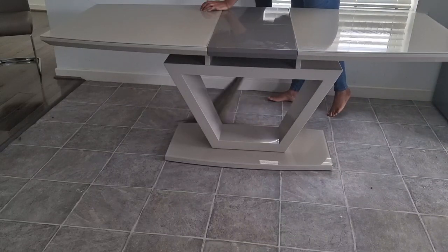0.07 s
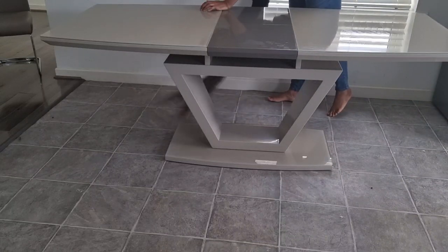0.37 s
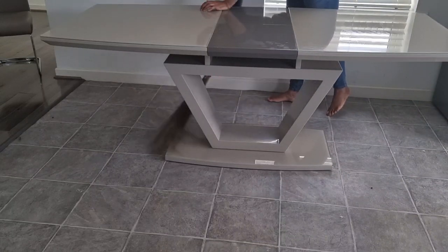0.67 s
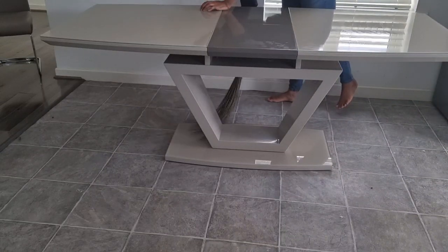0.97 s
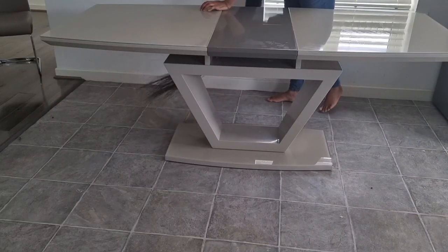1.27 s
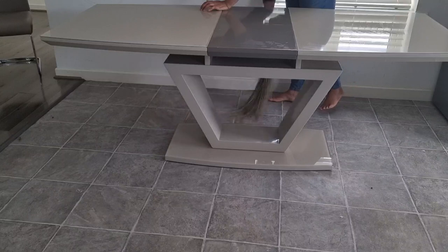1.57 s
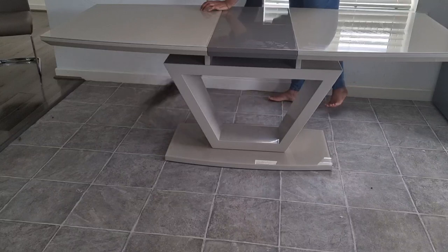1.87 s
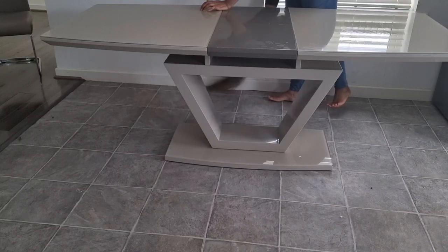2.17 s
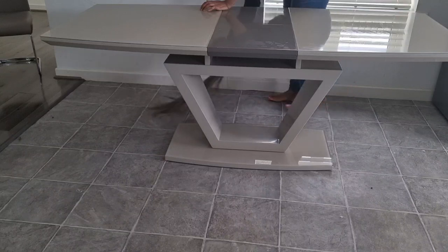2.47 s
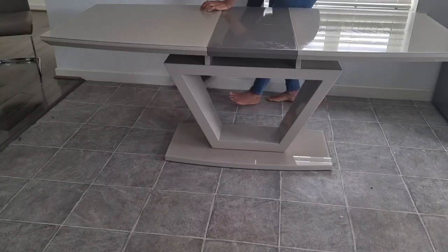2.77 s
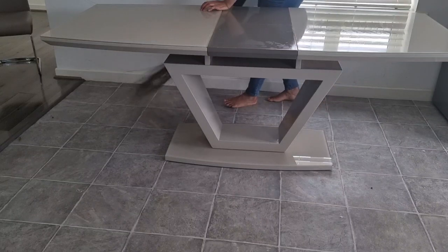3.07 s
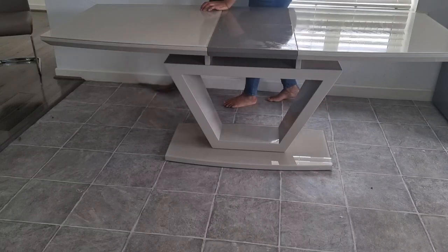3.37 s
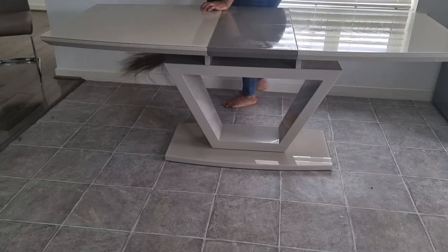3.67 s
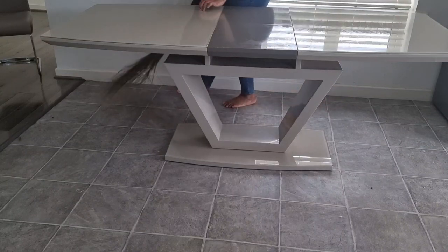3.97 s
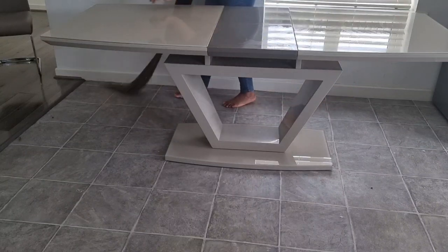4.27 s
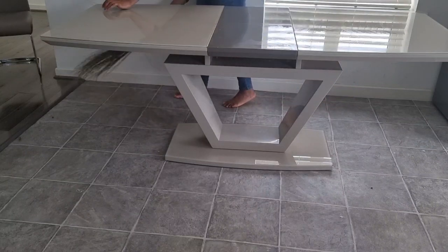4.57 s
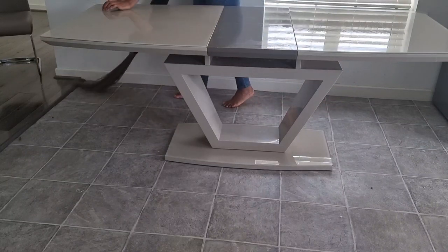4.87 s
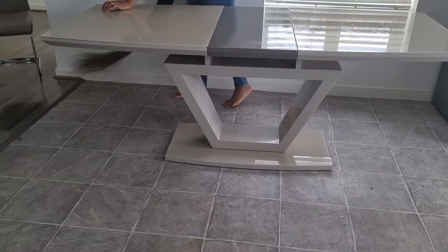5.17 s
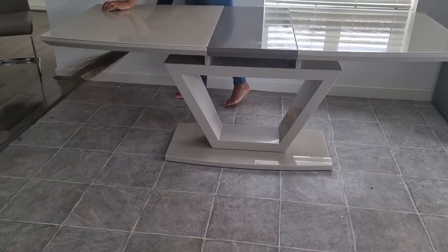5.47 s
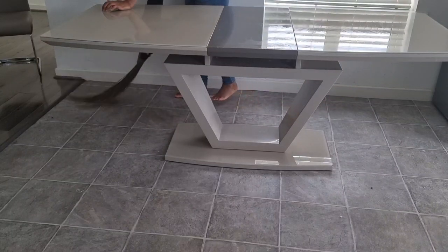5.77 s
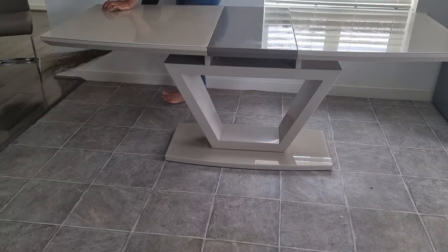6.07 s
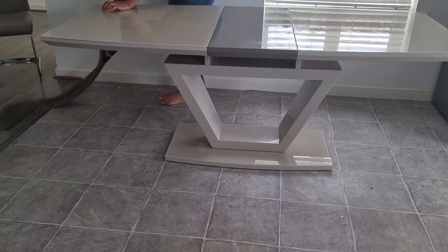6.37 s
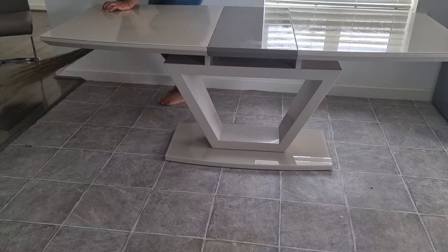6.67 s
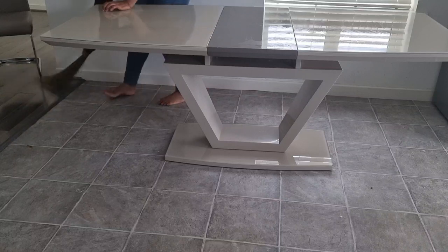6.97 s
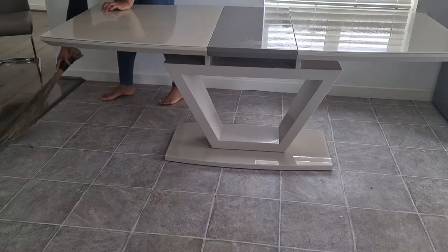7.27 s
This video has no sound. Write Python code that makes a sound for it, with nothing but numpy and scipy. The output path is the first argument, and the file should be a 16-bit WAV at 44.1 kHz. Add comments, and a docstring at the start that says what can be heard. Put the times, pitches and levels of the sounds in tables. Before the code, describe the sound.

A soft grass broom sweeps a tiled floor a few metres from the microphone, in a hard-walled room with a brief echo. Strokes come two or three times a second, each a low rasp opening into a bright hiss, strongest in the middle and lighter near the end. The broom occasionally brushes hollow furniture, bare heels thud softly, and an appliance hums faintly underneath.

```python
"""Sweeping a tiled floor

A soft grass broom sweeps a hard-walled room, a few metres away. Its fibres catch and slip in
countless tiny clicks: each stroke lands with a low rasp, rubs along the tile and ends in a bright
hiss of flicking tips. Air moves and an appliance hums faintly. Now and then the broom brushes
hollow furniture, which rings, and a bare heel thuds on the floor."""
import sys
import numpy as np
from scipy import signal
from scipy.fft import rfft, irfft
from scipy.io import wavfile
from scipy.ndimage import uniform_filter1d, map_coordinates

SR = 44100
rng = np.random.default_rng(int(sys.argv[2]) if len(sys.argv) > 2 else 0)


def log_audio(samples):
    """Write samples as a 16-bit WAV file to the path given in sys.argv[1]."""
    # one column per channel
    frames = np.atleast_2d(samples).T
    # limit to full scale, then quantise
    limited = np.clip(frames, -1, 1)
    pcm = np.round(limited * 32767).astype(np.int16)
    wavfile.write(sys.argv[1], SR, pcm)


N = 331632
TIME = np.arange(N) / SR
FREQS = np.fft.rfftfreq(N, 1 / SR)


def undb(db):
    """Turn decibels into a number to multiply by."""
    return 10 ** (np.asarray(db) / 20)


def unit(x):
    """Scale a signal to an average (rms) size of 1."""
    return x / np.sqrt(np.mean(x ** 2))


def response(points):
    """Join (pitch_hz, level_db) points into a gain for every frequency."""
    hz, db = np.transpose(points)
    return undb(np.interp(np.log(FREQS + 1), np.log(hz), db))


def colour(x, points):
    """Give x a tone colour, at an average size of 1."""
    return unit(irfft(rfft(x) * response(points), N))


def wander(rate_hz):
    """A smooth random drift, about 1 in size."""
    step = max(int(SR / rate_hz), 1)
    held = rng.standard_normal(N)[np.arange(N) // step]
    return unit(uniform_filter1d(held, step))


def swell(t, width_s):
    """A smooth rise and fall around t = 0."""
    return np.exp(-(t / width_s) ** 2)


def diffuse(pair, lag_s=0.000385, blur_hz=477):
    """Walls send sound in from all sides: left and right agree in the bass and differ in the treble."""
    likeness = .93 * np.cos(2 * np.pi * FREQS * lag_s) / (1 + (FREQS / blur_hz) ** 4) ** .25
    mid = irfft(rfft(pair[0]) * np.sqrt(1 + likeness), N)
    side = irfft(rfft(pair[1]) * np.sqrt(1 - likeness), N)
    return np.array([mid + side, mid - side])


def slips(per_s, spread_db):
    """Fibres catch and let go: a crowd of tiny clicks, some larger than the rest."""
    happens = rng.random((2, N)) < per_s / SR
    size = undb(spread_db * np.minimum(rng.exponential(size=(2, N)), 6))
    return unit(diffuse(happens * size * rng.standard_normal((2, N))))


def bend(x, ratio):
    """Bending stalks stiffen and slacken, so their pitch shifts by this ratio."""
    return np.array([map_coordinates(side, [np.cumsum(ratio)], mode="mirror") for side in x])


# Broom strokes. Press and flick times count from the landing; stiffer stalks rasp higher.
# start_s, attack_s, hold_s, level_db, press_at_s, press_width_s, press_db,
# flick_at_s, flick_width_s, flick_db, rasp_pitch_ratio
STROKES = [(-0.047, 0.04, 0.4, -8.8, 0.26, 0.13, 10, 0.21, 0.15, 13, 1.2),
           (0.421, 0.052, 0.2, -8.4, 0.071, 0.15, 10.5, 0.1, 0.047, 8.5, 1.15),
           (0.612, 0.022, 0.28, -9, 0.12, 0.11, 11, 0.18, 0.072, 10.5, 1.25),
           (0.9, 0.067, 0.37, -8.0, 0.24, 0.28, 5.5, 0.34, 0.11, 7.5, 1.3),
           (1.423, 0.084, 0.24, -13.6, 0.17, 0.11, 8.5, 0.16, 0.14, 11.0, 1.14),
           (1.596, 0.071, 0.38, -8.0, 0.28, 0.14, 8.5, 0.2, 0.18, 14.5, 1.3),
           (2.159, 0.079, 0.085, -4, 0.15, 0.19, 15.5, 0.094, 0.096, 7.5, 0.97),
           (2.288, 0.075, 0.31, 2, 0.28, 0.25, 6, 0.13, 0.046, 3.5, 1.03),
           (2.757, 0.049, 0.34, -2, 0.12, 0.071, 12, 0.22, 0.089, 8.5, 1.05),
           (3.263, 0.046, 0.32, -2.5, 0.078, 0.13, 8, 0.14, 0.16, 6.5, 1.12),
           (3.694, 0.044, 0.15, 2.15, 0.018, 0.13, 7.5, 0.0098, 0.05, 2.5, 0.9),
           (3.872, 0.049, 0.27, -11, 0.14, 0.12, 14, 0.083, 0.13, 15.5, 0.9),
           (4.17, 0.044, 0.32, -1, 0.036, 0.12, 8, 0.21, 0.088, 6, 1.07),
           (4.676, 0.028, 0.02, -16.5, 0.01, 0.04, -2, 0.06, 0.055, 5, 1.2),
           (4.765, 0.04, 0.16, 0.9, 0.08, 0.055, 8.5, 0.26, 0.095, 8, 1),
           (5.214, 0.039, 0.16, 2, 0.091, 0.092, 8.5, 0.25, 0.1, 7.5, 1.55),
           (5.604, 0.043, 0.22, -3.5, 0.087, 0.067, 8, 0.31, 0.2, 15, 1.5),
           (6.183, 0.04, 0.4, -8.5, 0.11, 0.1, 10.5, 0.29, 0.27, 7, 1.26),
           (6.831, 0.068, 0.63, -11, 0.1, 0.13, 8.5, 0.15, 0.27, 5, 1.13),
           (7.443, 0.036, 0.11, -13.0, 0.066, 0.09, 4, 0.06, 0.09, 4.5, 1.33)]


def stroke_db(base_db, contact_share, press_share=0, flick_share=0, lift_db_per_s=55):
    """Loudness as the broom lands, presses, flicks and lifts; the shares say how much each counts."""
    power = 1e-12
    for start_s, attack_s, hold_s, level_db, *gesture, _ in STROKES:
        press_at_s, press_width_s, press_db, flick_at_s, flick_width_s, flick_db = gesture
        age = TIME - start_s
        on = (age > 0) & (age < 1.5)
        age = age[on]
        landing = 20 * np.log10(np.minimum(age / attack_s, 1))
        lift = lift_db_per_s * np.maximum(age - hold_s, 0)  # the fibres peel off the tile
        contact = contact_share * (level_db + landing - lift)
        press = press_share * press_db * swell(age - press_at_s, press_width_s)
        flick = flick_share * flick_db * swell(age - flick_at_s, flick_width_s)
        gain = np.zeros(N)
        gain[on] = undb(base_db + contact + press + flick)
        power = power + gain ** 2
    return 10 * np.log10(power)


# Tone of the rasping stalks: pitch_hz, level_db
RASP_TONE = [(80, -40), (160, -8), (300, -3), (430, -2), (620, 0.5), (800, 3.2), (1000, 3.5), (1300, 1),
             (2200, -17), (4000, -24)]


def rasp():
    """Pressed stalks rasp low; each stroke keeps its own pitch until the next one lands."""
    strokes = np.array(STROKES)
    latest = np.maximum(np.searchsorted(strokes[:, 0], TIME) - 1, 0)
    pitch_ratio = strokes[latest, -1]
    level_db = stroke_db(base_db=-58, contact_share=0.9, press_share=1.0367)
    scrape = colour(slips(per_s=6000, spread_db=0.5), RASP_TONE)
    return bend(scrape, pitch_ratio) * undb(level_db)


# Tone of the rubbing stalks: pitch_hz, level_db
RUB_TONE = [(600, -40), (1000, -9.5), (1350, 2.5), (1750, 0.5), (2150, -2), (2900, -5), (4500, -13)]


def rub():
    """Stalks rub along the tile, a little louder in both the press and the flick."""
    level_db = stroke_db(base_db=-47, contact_share=0.85, press_share=0.33, flick_share=0.2373)
    friction = colour(slips(per_s=16000, spread_db=0.5), RUB_TONE)
    return bend(friction, 1 + .015 * wander(8)) * undb(level_db)


# Tone of the swishing fibres: pitch_hz, level_db
SWISH_TONE = [(1500, -30), (2300, -7.5), (2900, -1.04), (3600, -1), (4700, -2), (6000, -1.5), (8000, -2),
              (12000, -14)]


def swish():
    """Sliding fibres swish, swelling with the flick."""
    level_db = stroke_db(base_db=-40, contact_share=1, flick_share=0.5961)
    friction = colour(slips(per_s=20000, spread_db=0.8), SWISH_TONE)
    return bend(friction, 1 + .015 * wander(8)) * undb(level_db)


# Tone of the flicking tips: pitch_hz, level_db
TIPS_TONE = [(3500, -35), (5000, -13.5), (6300, -5), (7800, -2.5), (8700, -2.5), (11300, 0), (12500, 1.5),
             (13700, 3.5), (15500, 0)]
# Boost of the highest sizzle over the hiss below it: time_s, boost_db
SIZZLE_BOOST = [(0, 1), (1.8, 2.5), (2.9, 0), (3.4, 1.5), (4.4, 1), (5.0, 0.5), (5.28, 2), (5.5, -1.5),
                (5.85, -2.5), (6.4, -1), (7.5, 4)]


def tips(sizzle_hz=11300):
    """Flicking tips hiss brightly; a faster stroke sets more of them slipping each second."""
    level_db = stroke_db(base_db=-37, contact_share=1.33, flick_share=1.1048)
    speed = undb(.2 * (level_db - level_db.max()))
    clicks = slips(per_s=40000 * speed, spread_db=2.2) / np.sqrt(speed)  # kept evenly loud
    hiss = colour(clicks, TIPS_TONE)
    sizzle = irfft(rfft(hiss) / (1 + (sizzle_hz / np.maximum(FREQS, 1000)) ** 20), N)
    boost_db = np.interp(TIME, *np.transpose(SIZZLE_BOOST))
    hiss = sizzle * undb(boost_db / 2) + (hiss - sizzle) * undb(-boost_db / 2)
    return hiss * undb(level_db)


def fan_out(x, depth_db, rate_hz):
    """The fibres bend and fan out, so each octave swells and fades a little on its own."""
    octave = np.log2(np.clip(FREQS, 250, 16000) / 250)
    spectrum, out = rfft(x), 0
    for k in range(7):
        band = np.maximum(1 - np.abs(octave - k), 0)
        out = out + irfft(spectrum * band, N) * undb(depth_db * wander(rate_hz))
    return out


def broom():
    """The whole bundle sounds together and flutters over the uneven tile."""
    bundle = tips() + swish() + rub() + rasp()
    flutter = undb(0.33 * wander(45))
    return fan_out(bundle, depth_db=0.88, rate_hz=15) * flutter


# Tone of the echo, strongest in the middle: pitch_hz, level_db
WALL_TONE = [(150, -1), (500, 2), (1600, 2), (2800, -3), (6000, -5.5), (15000, -34)]


def room(x, ring_s, turns_per_s):
    """Tile and bare walls ring briefly; two echo patterns trade places as the broom travels."""
    turn, out = 2 * np.pi * turns_per_s * TIME, 0
    for share in (np.cos(turn), np.sin(turn)):
        tail = diffuse(rng.standard_normal((2, N))) * undb(-60 * TIME / ring_s)
        tail = unit(tail) / np.sqrt(N)
        dull_tail = irfft(rfft(tail) * response(WALL_TONE), N)[:, :SR // 2]
        out = out + signal.fftconvolve(x * share, dull_tail, axes=1)[:, :N]
    return out


# Tone of the room's air: pitch_hz, level_db
AIR_TONE = [(25, -27), (42, -50), (60, 1.5), (85, 2), (140, -4.5), (190, 4.5), (250, 4.5), (330, 1),
            (450, -5.5), (800, 2), (1400, -45), (3000, -20), (8000, -12.5), (15000, -17)]


def air(level_db):
    """Moving air makes a soft, steady rush."""
    return colour(diffuse(rng.standard_normal((2, N))), AIR_TONE) * undb(level_db)


# Notes in the appliance's hum: pitch_hz, level_db
HUM_NOTES = [(60, -80), (117, -79), (198, -77), (238, -71.5), (294, -73.5), (367, -78), (815, -102)]


def hum():
    """A motor hums several notes, each a little unsteady in loudness and pitch."""
    out = np.zeros(N)
    for pitch_hz, level_db in HUM_NOTES:
        gain = undb(level_db + 2.45 * wander(5))
        out += gain * unit(np.sin(2 * np.pi * pitch_hz * TIME + 1.3 * wander(9)))
    return out


# Notes a hollow panel rings at: pitch_ratio, width_hz, level_db
PANEL_NOTES = [(1, 24, 6), (2.8, 50, -23), (3.72, 45, -5.5)]
# The broom brushes furniture: middle_s, length_s, lowest_pitch_hz, level_db
FURNITURE_TOUCHES = [(0.495, 0.085, 530, -54.5), (0.66, 0.28, 526, -63.5), (1.127, 0.39, 534, -66),
                     (2.58, 0.19, 533, -59), (6.22, 0.069, 363, -60.5)]


def furniture(boost_db):
    """Fibres dragged over a hollow panel keep it ringing evenly while each touch swells and fades."""
    out = np.zeros((2, N))
    for middle_s, length_s, lowest_hz, level_db in FURNITURE_TOUCHES:
        panel = sum(undb(note_db) / (1 + 1j * (FREQS - ratio * lowest_hz) / width_hz) ** 2
                    for ratio, width_hz, note_db in PANEL_NOTES)
        friction = diffuse(rng.standard_normal((2, N)))
        ring = irfft(rfft(friction) * panel, N)
        strength = np.sqrt(uniform_filter1d(np.mean(ring ** 2, axis=0), size=2000))
        out += ring / strength * undb(level_db + boost_db) * swell(TIME - middle_s, length_s / 2)
    return out


# Bare heels on the floor: middle_s, level_db
HEEL_THUDS = [(1.91, -58), (2.945, -61), (4.03, -49.5), (7.06, -53)]


def heels(floor_hz, push_s):
    """A soft heel pushes on the floor, which swings a few times."""
    out = np.zeros(N)
    for middle_s, level_db in HEEL_THUDS:
        t = TIME - middle_s
        out += undb(level_db) * np.sin(2 * np.pi * floor_hz * t) * swell(t, push_s)
    return out


def scene():
    """The broom and its echo, furniture and feet, over the room's air and hum."""
    sweep = broom()
    echo = undb(-6.5) * room(sweep, ring_s=0.19, turns_per_s=0.4486)
    bumps = furniture(boost_db=3.5) + heels(floor_hz=62.3, push_s=0.023)
    return sweep + echo + bumps + air(level_db=-60.5) + hum()


# How the two microphone openings differ in tone: pitch_hz, left_minus_right_db
MIC_BALANCE = [(100, -2.5), (300, -1), (1200, -1), (2600, 0), (4500, -1.4), (7000, 0), (7900, -0.5),
               (8600, -2), (10000, 6.5), (11300, -7.5), (12400, 7.5), (13100, -6), (15000, 7)]


def record(dry):
    """Each microphone opening colours the sound its own way; the highest treble is cut steeply."""
    top_hz = 15600
    tilt = np.sqrt(response(MIC_BALANCE))
    treble_cut = 1 / np.sqrt(1 + (FREQS / top_hz) ** 600)
    return irfft(rfft(dry) * np.array([tilt, 1 / tilt]) * treble_cut, N)


dry = scene()
out = record(dry)
log_audio(out)
```